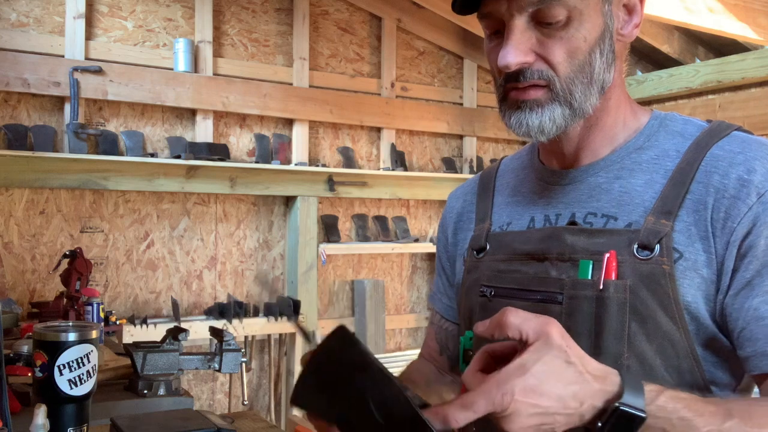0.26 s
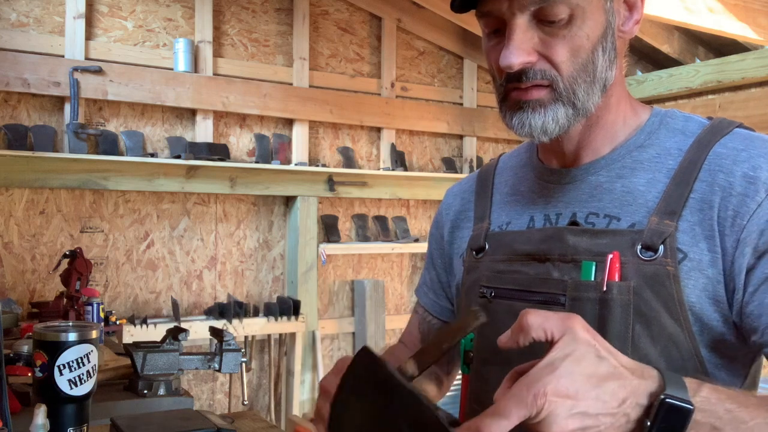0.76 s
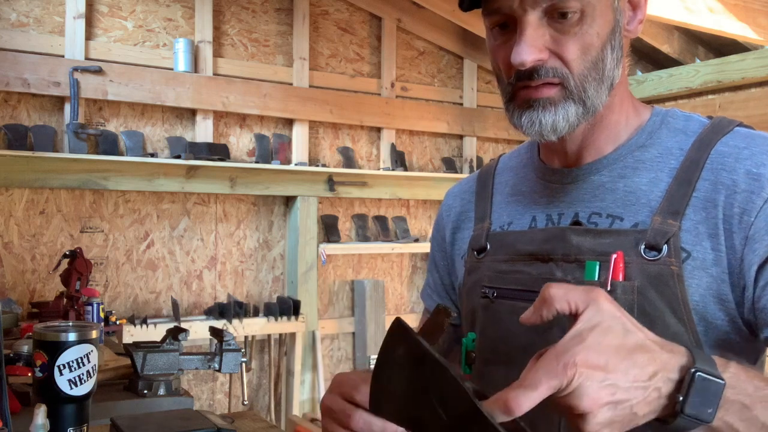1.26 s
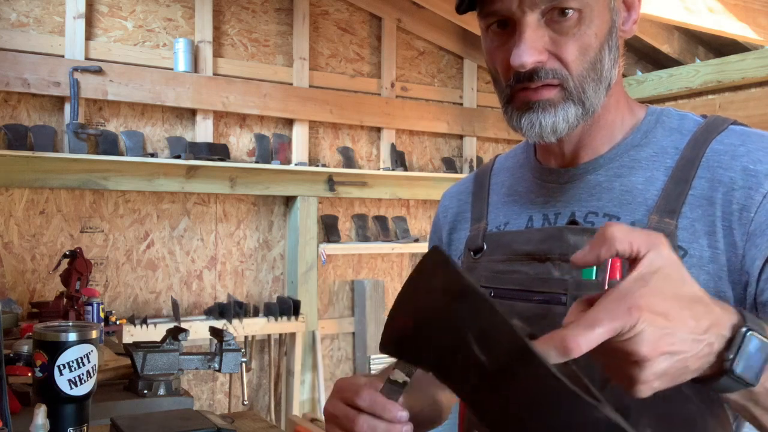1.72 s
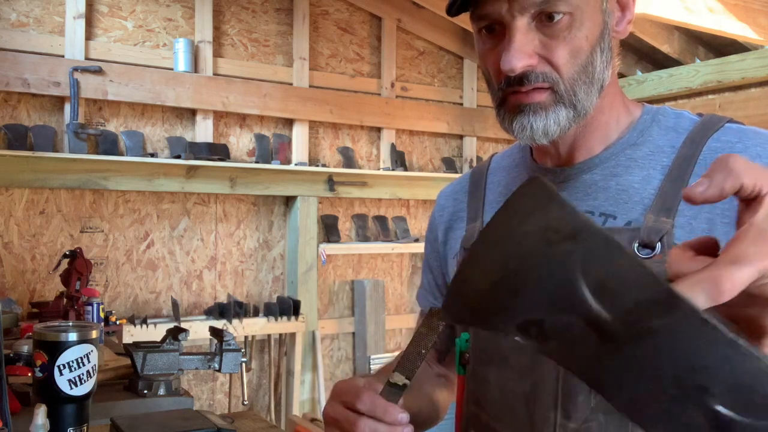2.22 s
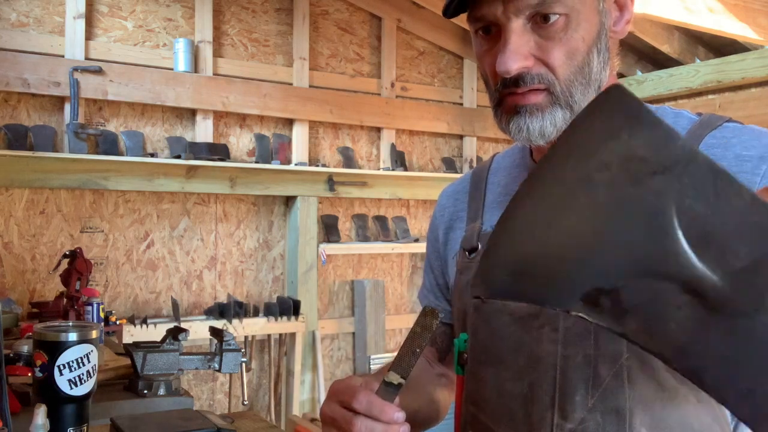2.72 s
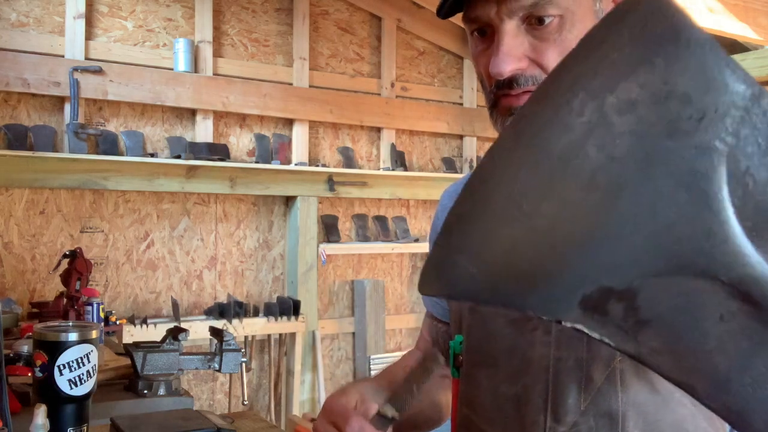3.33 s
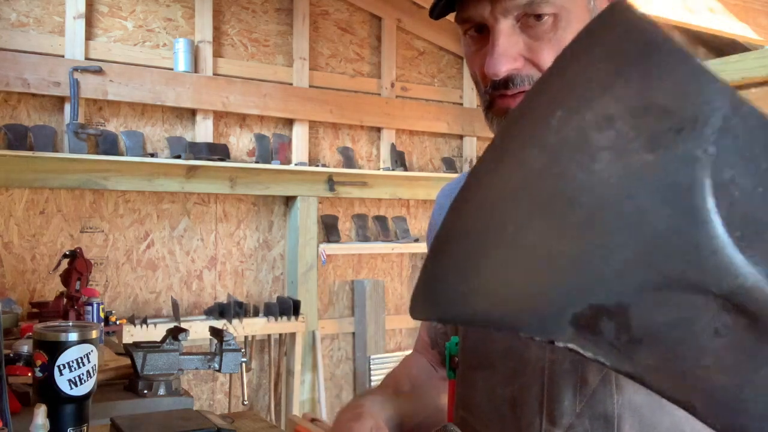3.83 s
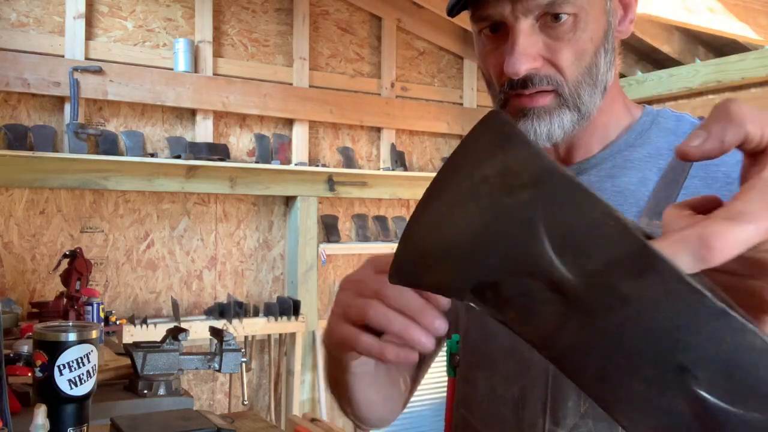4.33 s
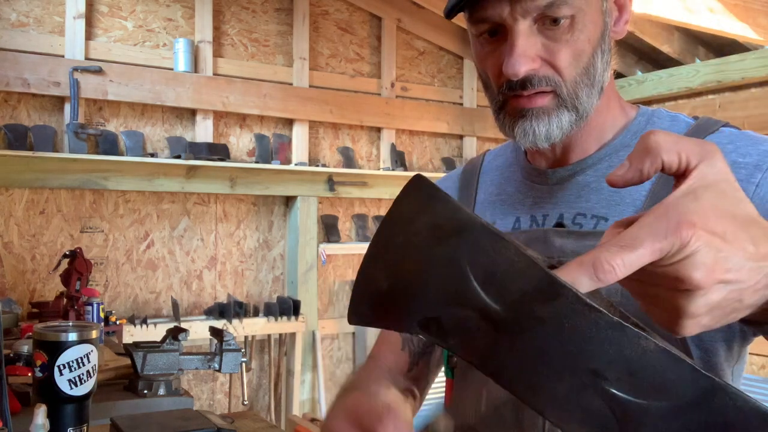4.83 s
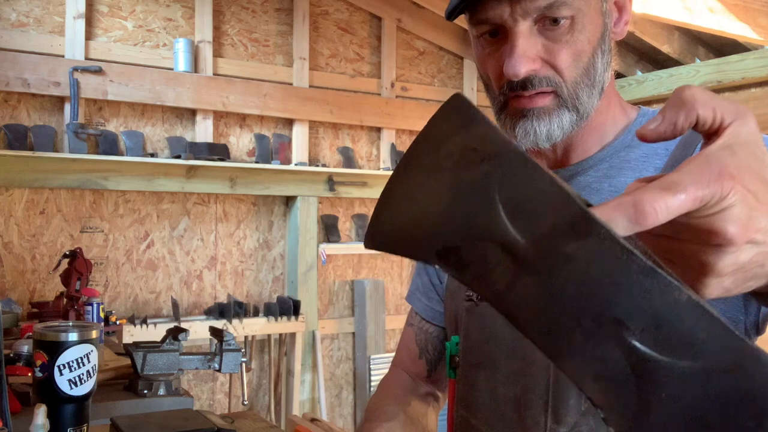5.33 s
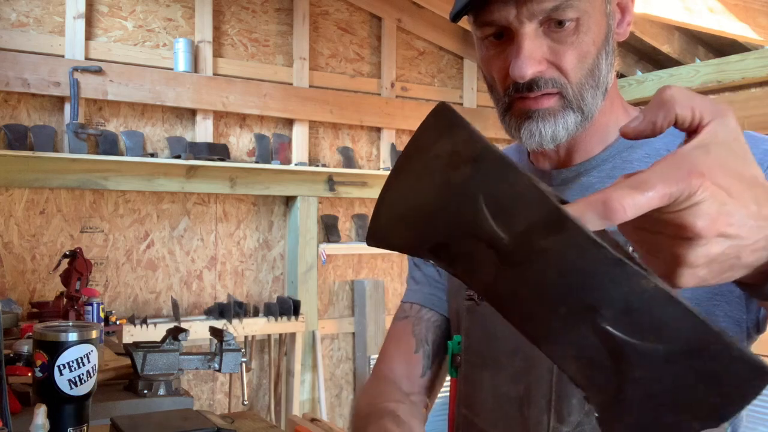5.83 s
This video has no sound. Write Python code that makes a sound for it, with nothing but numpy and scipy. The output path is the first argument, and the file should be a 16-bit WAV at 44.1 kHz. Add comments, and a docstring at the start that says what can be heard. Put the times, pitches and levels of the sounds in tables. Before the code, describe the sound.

A bare axe head is hit three times with a metal bar in a wooden shop, cracking sharply and singing high and long above a faint motor hum.

```python
"""A bare steel axe head hangs on a finger in a wooden workshop and is struck three times with a steel bar.
Each blow is a crack of shaped noise, a knock near 1 kHz, a falling low thump, a spray of decaying sine modes
and an echo of noise that dies band by band. One long sine mode sings on and swells, fades and shifts between
the ears as the head swings. Low noise and wavering sines make the room's rumble and motor hum, under a faint
hiss; bands of grainy noise make a low hum near 93 Hz at the start, soft rustles and thin whistles."""
import sys
import numpy as np
from scipy import signal
from scipy.fft import rfft, irfft
from scipy.io import wavfile
from scipy.ndimage import uniform_filter1d

SR = 44100
rng = np.random.default_rng(int(sys.argv[2]) if len(sys.argv) > 2 else 0)


def transcribe(u):
    """Save the signal u as a 16-bit wav file named by the first command-line argument.

    u: samples, shape (n,) or (channels, n), limited to [-1, 1]; the rate is SR.
    q: integer samples, one column per channel.
    """
    v = np.clip(np.atleast_2d(u).T, -1, 1)
    q = np.round(v * 32767).astype(np.int16)
    wavfile.write(sys.argv[1], SR, q)


N = 267246
T = np.arange(N) / SR  # time, s
LEFT_RIGHT = np.array([[1], [-1]])  # opposite signs for the two ports

# The three blows: start_s, burst_s, crack_db, crack_tilt_db_per_octave, knock_db, thump_db, thump_sweep_hz,
# echo_db, echo_length_factor, long_mode_db (the last before the swing)
STRIKES = [(.8174, 0.0085, -11, 5, -32, -33.5, 246.8, -33, 1.54, -22),
           (4.5057, 0.0072, -11.5, 0, -18.5, -32.5, 280, -28, 0.94, -15),
           (5.9406, 0.0074, -10.5, 4, -41.5, -36.5, 356, -31.5, .72, -14.5)]
# Modes of the head: pitch_hz, initial_t60_s, left_minus_right_db, left_lead_rad,
# then level_db when struck at the first, second and third spot
HEAD_MODES = [(545, 0.34, -2, -0.3, -47, -59, -47), (1707.5, 0.76, 1, 0.8, -34, -15, -28),
              (1890.5, 0.49, 2, 0.1, -20, -28, -29), (2880, 0.25, 8, -2.8, -38, -34, -43),
              (3137.5, 0.39, 5, 0.7, -23, -16, -41), (3917, 0.23, 5, 0, -30, -25, -28),
              (4242, 0.41, -4, 0.4, -41, -45, -25), (4576, 0.4, -2, 0.5, -23, -26, -33),
              (4888, 0.9, 1, -1.7, -50, -45, -17), (5001, 0.33, 1, -2, -25, -14, -24),
              (5496, 0.32, 1, -1, -11, -21, -19), (5766, 0.47, 1, -1.6, -48, -42, -51),
              (6315, 0.26, 4, 0.1, -43, -39, -40), (6571, 0.33, -1, -1.7, -16, -10, -18),
              (6905, 0.4, 0, 2.5, -27, -21, -24), (7440, 0.29, 1, -2.8, -33, -37, -17),
              (8976, 0.37, 0, 2.7, -17, -13, -26), (9445, 0.33, 2, 2.4, -21, -23, -21),
              (9690, 0.29, 0, 1.9, -29, -35, -41), (10585, 0.23, 0, 1.7, -20, -35, -49),
              (11060, 0.27, 0, 0.9, -17, -19, -34), (11478, 0.41, 0, 0.7, -9, -22, -4),
              (11670, 0.8, 1, 0.4, -41, -33, -37), (11985, 0.25, 0, 0, -28, -33, -38),
              (12570, 0.25, 0, 0, -33, -35, -29), (13190, 0.16, 0, -0.4, -39, -18, -16),
              (13370, 0.28, 0, -0.7, -17, -37, -28), (13775, 0.27, 0, -0.9, -20, -21, -60),
              (14280, 0.2, 2, 0.1, -33, -40, -60), (14480, 0.15, -2, -1.9, -60, -25, -29)]


def amp(db):
    """Convert a level in dB to an amplitude ratio."""
    return 10 ** (np.asarray(db) / 20)


def rms_one(x):
    """Normalise the mean power to 1."""
    return x / np.sqrt(np.mean(x ** 2) + 1e-20)


def at_hz(points, hz):
    """Interpolate a spectrum linearly along a logarithmic frequency axis."""
    table_hz, values = np.array(points)[:, :2].T
    return np.interp(np.log(hz + 1), np.log(table_hz), values)


def bell_curve(x, centre, width):
    """Gaussian weighting of height 1; width is its standard deviation."""
    return np.exp(-.5 * ((x - centre) / width) ** 2)


def stereo_noise(gain, size):
    """Partial coherence: spectra of shaped noise at two ports, partly shared and shifted in phase."""
    # Phase between two microphone ports: pitch_hz, left_lead_rad
    port_lead = [(60, .3), (300, 1.0), (2000, .7), (4500, .1), (6500, -1.5), (8300, -3.2), (12300, -6.3),
                 (15000, -8.6)]
    # Coherence of the ports: pitch_hz, shared_amplitude (0 to 1)
    likeness = [(60, 0.97), (250, 0.99), (700, 0.1), (3000, .4), (6000, 0.2), (8500, 0.99), (15000, 0.93)]
    hz = np.arange(size // 2 + 1) * SR / size
    shared, own = rfft(rng.standard_normal((2, size)))
    alike = np.clip(at_hz(likeness, hz), 0, 1)
    lead = np.interp(hz, *np.transpose(port_lead))
    right = (alike * shared + np.sqrt(1 - alike ** 2) * own) * np.exp(-1j * lead)
    return hz, gain(hz) * np.array([shared, right])


def coloured(gain, size=N):
    """Spectral filtering of stereo noise, normalised to rms 1."""
    _, spectra = stereo_noise(gain, size)
    return rms_one(irfft(spectra, size))


def patches(per_s):
    """Random modulation: straight lines between random values drawn per_s times a second."""
    count = round(N / SR * per_s) + 2
    return np.interp(T * per_s, np.arange(count), 1.2 * rng.standard_normal(count))


def sinking():
    """Gain reduction in dB: after each blow the lasting sounds sink, hold and come back."""
    # One row per blow: returning_depth_db, hold_s (from the blow), return_s, lasting_depth_db
    dips = [(11, .15, .08, 0), (9, .06, .33, 4), (12.5, .2, .1, 0)]
    sink_s = 0.0037
    level_db = 0
    for blow, (depth_db, hold, back, stays_db) in zip(STRIKES, dips):
        t = T - blow[0]
        depth_now_db = stays_db + depth_db * np.clip(1 - (t - hold) / back, 0, 1)
        level_db = level_db - np.clip(t / sink_s, 0, 1) * depth_now_db
    return level_db


def background():
    """Broadband and tonal noise: room rumble, a motor hum of wavering partials, and faint hiss above."""
    # Rumble spectrum: pitch_hz, relative_level_db
    room_low = [(15, -41), (25, -16.5), (54, 0.5), (86, -6), (123, 0), (147, -10.5), (243, -15),
                (271, -18.5), (700, -39.5), (910, -65.5), (1540, -120)]
    # Hiss spectrum: pitch_hz, relative_level_db
    room_high = [(290, -29), (500, 0), (650, -10), (1570, -13.5), (2460, -19.5), (5880, -22), (7210, -12.5),
                 (8700, -32), (9770, -23.5), (12100, -20), (16000, -40)]
    # Motor hum: pitch_hz, level_db (sine peak against rumble rms), width_hz of the noise around it
    hum = [(120.6, -1, 5.4), (238.3, -13.5, 7.5), (370, -28, 3.2), (476, -28.5, 5.5)]
    quiet_db = -56  # rumble and hum together, before sinking
    hiss_db, hiss_follows = -79, 1.2  # level before sinking; how strongly it follows the sinking
    sunk_db = sinking()

    low = coloured(lambda hz: amp(at_hz(room_low, hz)))
    for hz, db, width in hum:
        waver = coloured(lambda f: bell_curve(f, hz, width))
        low = low + amp(db) * (np.sin(2 * np.pi * hz * T) + .2 * waver)
    low = rms_one(low) * amp(-LEFT_RIGHT)  # 2 dB stronger on the right

    high = coloured(lambda hz: amp(at_hz(room_high, hz)))
    stirring = coloured(lambda hz: amp(at_hz(room_high, hz)) * bell_curve(np.log2((hz + 1) / 600), 0, .7))
    high = high + amp(-8.5 + 1.3 * patches(6.3)) * stirring  # uneven faint rustle of clothes
    return amp(quiet_db + sunk_db) * low + amp(hiss_db + hiss_follows * sunk_db) * high


def singing():
    """A lightly damped mode: each blow resets its level, and the swing changes its gain, balance and phase."""
    # The mode at the ports as the head swings: time_s, gain_db, left_minus_right_db, left_lead_rad
    swing = [(0, 3, 6.5, -.5), (.12, -13, 17.5, -.8), (.18, -5, 4.5, .1), (.34, -11, 18, .4),
             (.44, -3, 8, 1.2), (.62, -4, 5, 1.2), (.78, -9, 3, 2.3), (.9, -8.5, -3.5, 1.05),
             (1.14, -.5, -3.5, .95), (1.32, 4.7, -3, .7), (1.5, 4.2, -3.2, .9), (1.62, .3, 1.3, 1.15),
             (1.68, -5.7, 10, .9), (1.74, -4.4, 2.7, -.65), (1.92, -3.4, -12, .15), (1.98, -5.5, -4, -.65),
             (2.22, 1.7, 6.5, .65), (2.48, -2, 2, 3.1), (2.56, -3.5, 1, 3.45), (2.66, -7, -3, 3.0),
             (2.76, -10, -2.7, 2.15), (2.88, -3.8, 8.5, -.1), (3.0, 1.7, 2.2, -.2), (3.3, -2, 1, 1.0),
             (3.55, -4, 9, 1.5), (3.76, -7.5, 7, 3.1), (3.9, -8, 8, 3.4), (4.02, -1, 2.5, 4.4),
             (4.17, -19, 0, 5.1), (4.42, -5, 0, 6.5), (4.56, -9.4, -9, 6.95), (4.62, -2.9, -2.7, 8.55),
             (4.74, 1.5, 7.4, 8.95), (5.04, -1.8, -6, 8.85), (5.22, .5, -5, 7.2), (5.4, 1.2, -1, 6.85),
             (5.64, 3.5, -4, 6.85), (6.06, -.2, -2, 7.05)]
    pitch_hz, start_db, loss_db_per_s = 2143.7, -52, 14  # start level is left by an earlier blow
    level_db = start_db - loss_db_per_s * T
    for s, *_, db in STRIKES:
        level_db = np.where(T >= s, db - loss_db_per_s * (T - s), level_db)
    s, *columns = np.transpose(swing)
    gain_db, pan_db, lead = [uniform_filter1d(np.interp(T, s, c), size=SR // 25) for c in columns]
    level_db = uniform_filter1d(level_db, size=88) + gain_db + sinking()  # 2 ms smoothing of the resets
    turn = 2 * np.pi * pitch_hz * T
    return amp(level_db + LEFT_RIGHT * pan_db / 2) * np.sin(turn + LEFT_RIGHT * lead / 2)


def earlier_blow():
    """Free decay: modes of an earlier blow are still dying at the start."""
    # pitch_hz, level_db at the start, t60_s
    remnants = [(1707.5, -72.5, .6), (4730, -83.5, 0.29)]
    return sum(amp(db - 60 * T / t60) * np.sin(2 * np.pi * hz * T) for hz, db, t60 in remnants)


def small_sounds():
    """Band-limited grainy noise: a low hum near 93 Hz at the start, soft rustles and faint thin whistles."""
    # centre_s, length_s (three standard deviations), centre_hz, width_octaves, level_db (before the grain)
    bands = [(0.18, 0.39, 93.1, .07, -56), (0.436, 0.086, 450, 0.75, -62),
             (2.733, 0.097, 1230, 0.46, -68.5), (3.329, 0.08, 1090, 0.23, -85),
             (3.477, 0.089, 490, 0.38, -70.5), (3.57, 0.15, 700, 0.6, -78), (3.99, 0.21, 900, 1, -82),
             (0.449, 1, 7290, 0.0058, -85), (3.596, .8, 5233, .04, -87.5), (4.191, 0.62, 7320, .007, -85.5)]
    out = 0
    for s, length, hz, width, db in bands:
        band = coloured(lambda f: bell_curve(np.log2((f + 1) / hz), 0, width))
        grain_gain = amp(db + 3.9 * patches(60))
        out = out + grain_gain * bell_curve(T, s, length / 3) * band
    return out


def crack(db, burst_s, tilt_db, t):
    """Contact noise: a burst of a few ms, whose level then drops quickly to a weaker tail."""
    # Contact spectrum before the tilt: pitch_hz, relative_level_db
    contact_spectrum = [(410, -67), (700, -41), (1400, -28), (2080, -5), (3600, -24), (4490, 4.5),
                        (5060, -14), (5610, -7.5), (6150, -24), (6830, 6), (8210, -23.5), (9230, 5.5),
                        (10100, -9.5), (13000, -6.5), (16000, -34.5)]
    noise = coloured(lambda hz: amp(at_hz(contact_spectrum, hz) + tilt_db * np.log2((hz + 50) / 6000)), len(t))
    after_burst = np.maximum(t - burst_s, 0)  # s since the burst ended
    drop_db = 9 * np.minimum(after_burst / .0015, 1) + 60 * after_burst / .07
    return amp(db - 210 * t - drop_db) * np.clip(t / 0.00057, 0, 1) * noise


def knock(db, t):
    """First contact as a Gaussian tone burst: a cycle or two near 1 kHz, stronger and earlier on the left."""
    turn = 2 * np.pi * 1250 * t - np.array([[0], [.6]])
    return amp(db) * bell_curve(t, 0.001, 0.00042) * np.sin(turn) * amp(1.5 * LEFT_RIGHT)


def thump(db, sweep_hz, t):
    """A damped downward glide: the blow's push swells in a little late and falls toward 40 Hz."""
    # the glide starts 0.00929 / 0.0068 (1.37) times sweep_hz above 40 Hz
    turn = 2 * np.pi * (sweep_hz * 0.00929 * (1 - np.exp(-t / 0.0068)) + 40 * t)
    side = np.exp(-t / 0.01509) * LEFT_RIGHT  # its top is stronger and earlier on the left
    level_db = db - 60 * t / 0.077 + 2.0 * side
    return amp(level_db) * np.sin(turn + .7 * side) * np.clip(t / 0.004554, 0, 1) ** 2


def modes(spot, t):
    """Modal superposition: the struck spot sets mode strengths; modes waver slowly and their decay steepens."""
    out = 0
    for hz, t60, pan_db, lead, *spot_db in HEAD_MODES:
        start, beat, beat_start = rng.random(3)
        turn = 2 * np.pi * (hz * t + start) - lead * np.array([[0], [1]])
        beat_turn = 2 * np.pi * ((5.6 + 8.3 * beat) * t + beat_start)
        waver = 1 + 0.23 * np.minimum(t / 0.082, 1) * np.sin(beat_turn)
        dying_db = 60 * (t / t60 + t ** 2)  # the decay steepens with time
        level_db = spot_db[spot] + pan_db * LEFT_RIGHT / 2 - dying_db
        out = out + amp(level_db) * waver * np.sin(turn)
    return out * np.clip(t / .005, 0, 1)


def near_modes(hz, spot):
    """Modal density: many weak neighbours crowd around strongly struck modes as lumps in the echo."""
    lumps_db = 4 * np.interp(hz, np.arange(600) * 40, rng.standard_normal(600))  # a random lump every 40 Hz
    crowd = .3
    for mode in HEAD_MODES:
        strength = amp(0.2 * (mode[4 + spot] + 30))
        crowd = crowd + strength * bell_curve(hz, mode[0], 70)
    return amp(lumps_db) * crowd


def echo(db, longer, spot, t):
    """Reverberant decay: the shop answers with half-octave bands of noise, each dying at its own rate."""
    # Echo spectrum before the mode lumps: pitch_hz, relative_level_db
    echo_spectrum = [(300, -49.5), (1000, -27), (1600, -24), (2200, -23.5), (2570, -46), (3080, -14),
                     (3640, -37.5), (4440, -11), (6740, -12.5), (8220, -44.5), (8900, -23.5), (11500, -9),
                     (14200, -21.5), (16000, -81)]
    # Reverberation time before the blow's length factor: pitch_hz, t60_s
    echo_decay = [(400, .3), (1500, .4), (4500, .45), (7000, 0.34), (10000, 0.59), (15000, .15)]
    hz, spectra = stereo_noise(lambda f: amp(at_hz(echo_spectrum, f)) * near_modes(f, spot), len(t))
    undamped, dying = 0, 0
    for low in 300 * 2 ** np.arange(0, 6, .5):  # lower band edges, Hz
        band = irfft(spectra * ((hz >= low) & (hz < low * np.sqrt(2))), len(t))
        t60 = longer * at_hz(echo_decay, 1.4 * low)
        undamped = undamped + band
        dying = dying + band * amp(-60 * t / t60)
    return amp(db) * dying / np.std(undamped) * np.clip(t / 0.012, 0, 1)


def blows():
    """Impact excitation: contact sounds and echo, and modes that sink with the other lasting sounds."""
    out, rings, t = np.zeros((2, N)), np.zeros((2, N)), T[:SR]
    for spot, strike in enumerate(STRIKES):
        s, burst_s, crack_db, tilt_db, knock_db, thump_db, sweep_hz, echo_db, longer, _ = strike
        contact = crack(crack_db, burst_s, tilt_db, t) + knock(knock_db, t) + thump(thump_db, sweep_hz, t)
        add(out, s, contact + echo(echo_db, longer, spot, t))
        add(rings, s, modes(spot, t))
    return out + amp(sinking()) * rings


def add(out, s, piece):
    """Linear superposition of a piece from time s."""
    i = round(s * SR)
    out[:, i:i + piece.shape[1]] += piece[:, :N - i]


def scene():
    """Linear superposition of all sources."""
    return background() + singing() + earlier_blow() + small_sounds() + blows()


def record(dry):
    """Soft saturation rounds peaks near full scale; a steep low-pass filter cuts the top."""
    cutoff_hz = 16500  # stopband edge, 70 dB down
    rounded = dry / (1 + np.abs(dry / .95) ** 4) ** .25
    return signal.sosfilt(signal.cheby2(12, 70, cutoff_hz, fs=SR, output="sos"), rounded)


dry = scene()
out = record(dry)
transcribe(out)
```